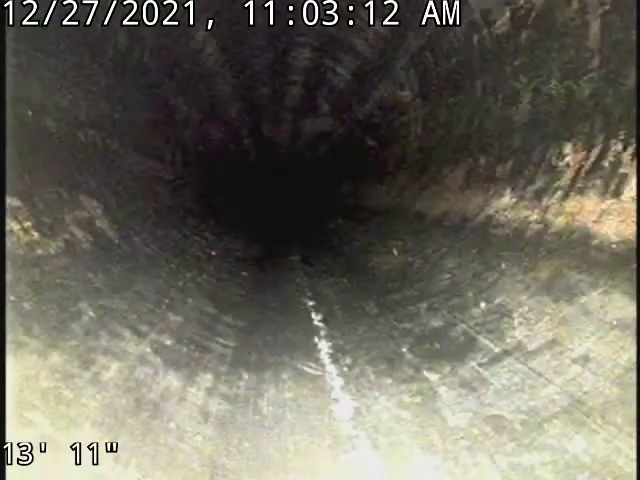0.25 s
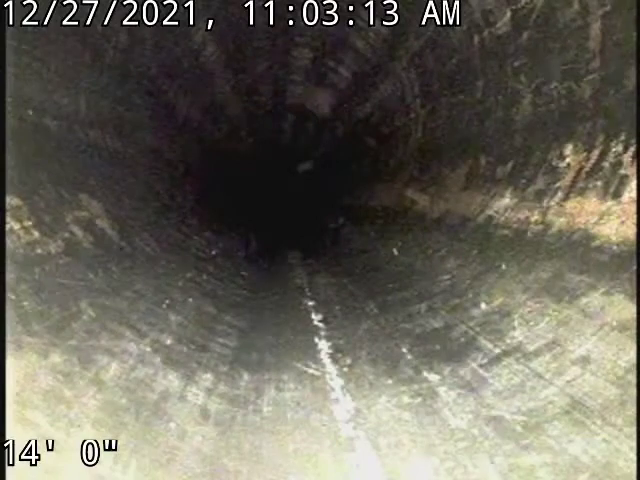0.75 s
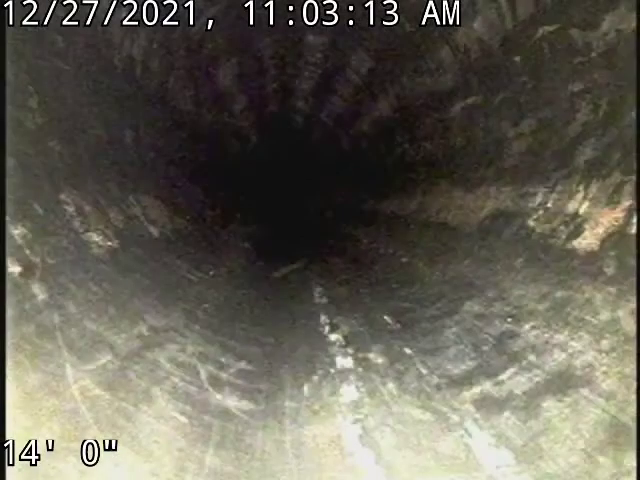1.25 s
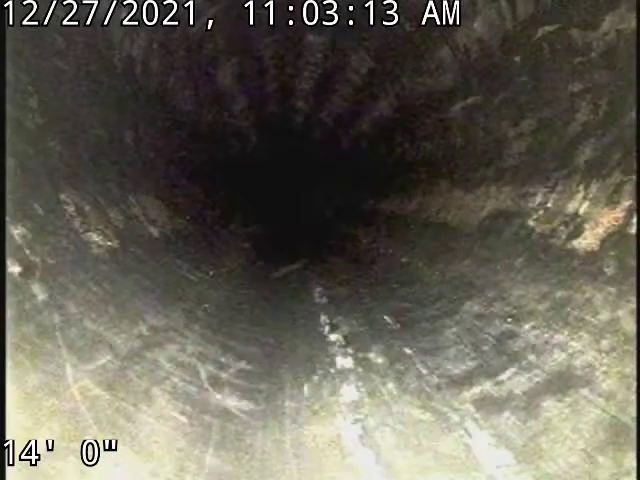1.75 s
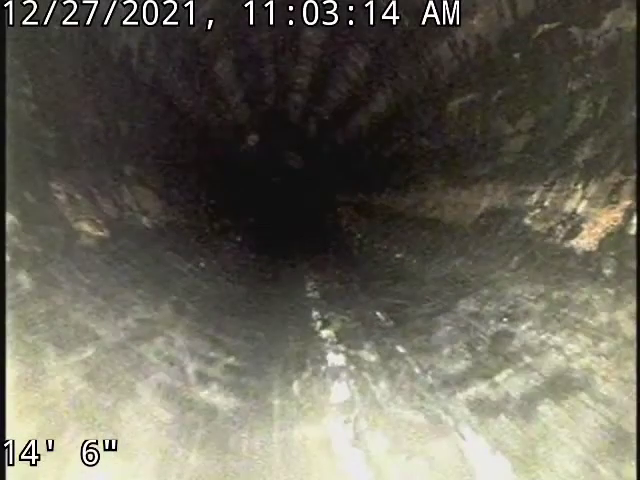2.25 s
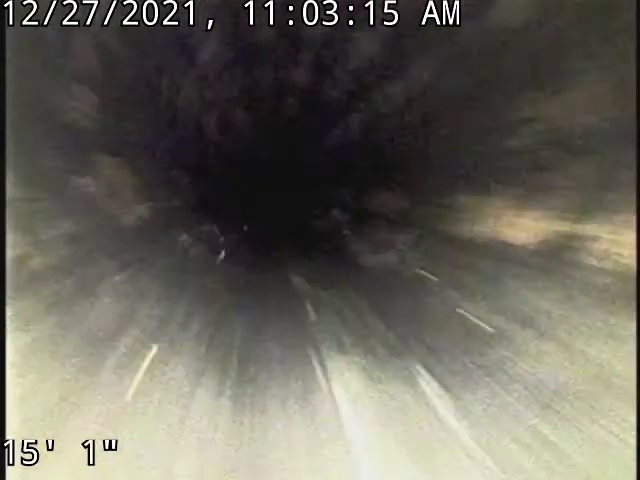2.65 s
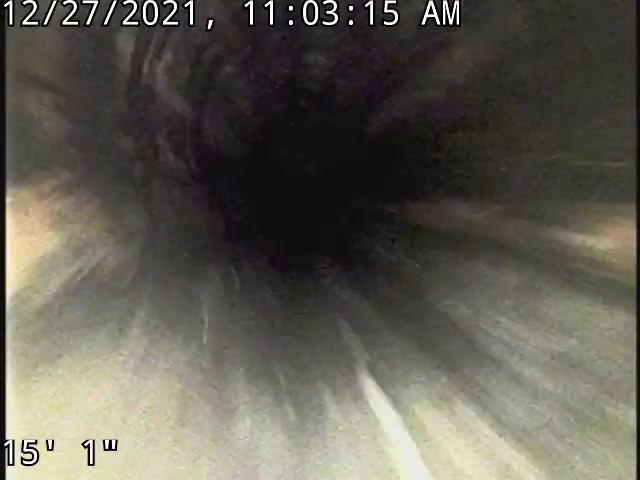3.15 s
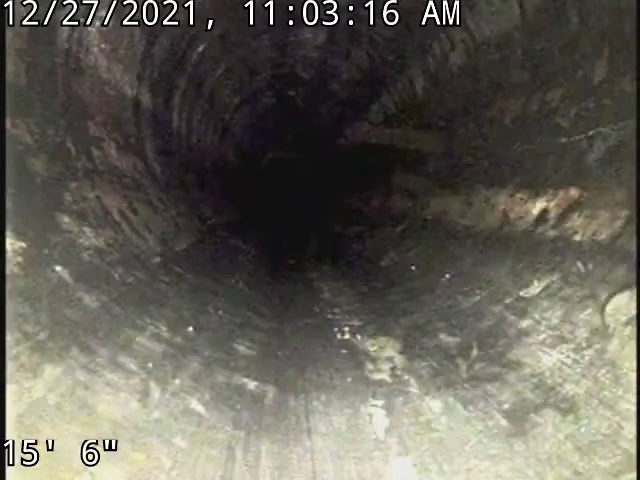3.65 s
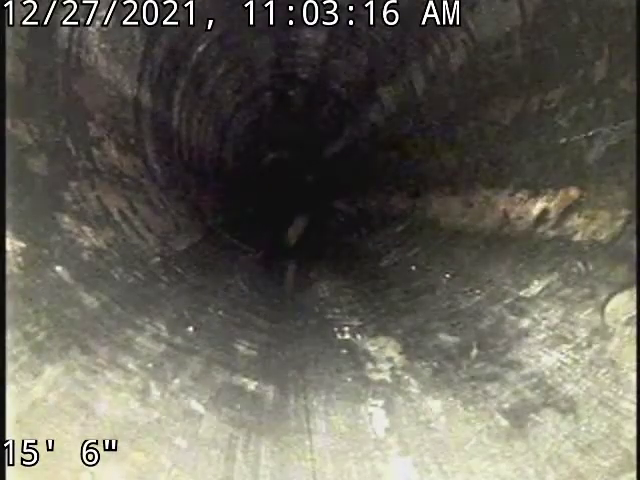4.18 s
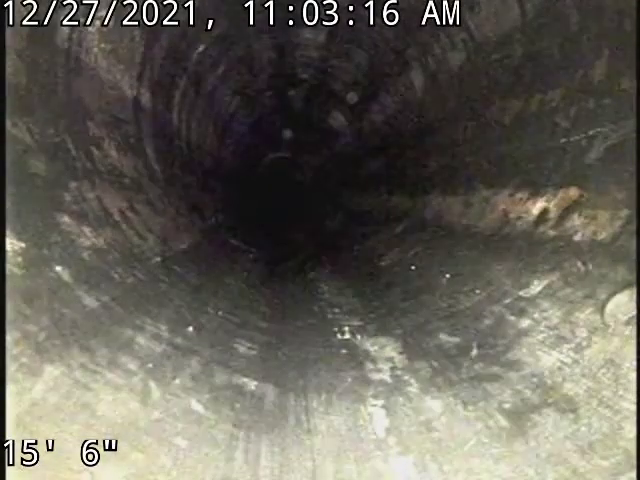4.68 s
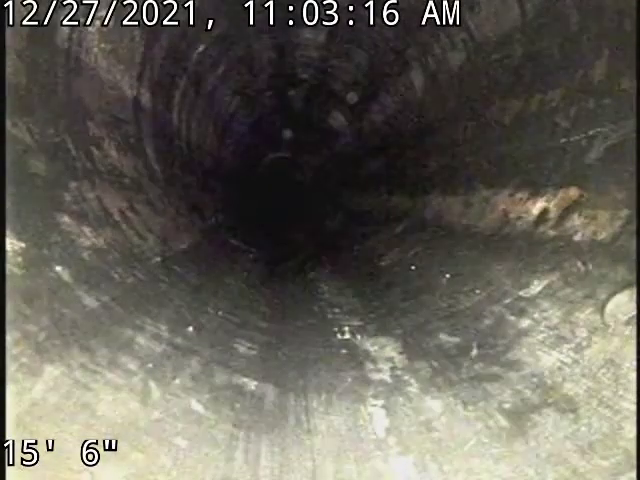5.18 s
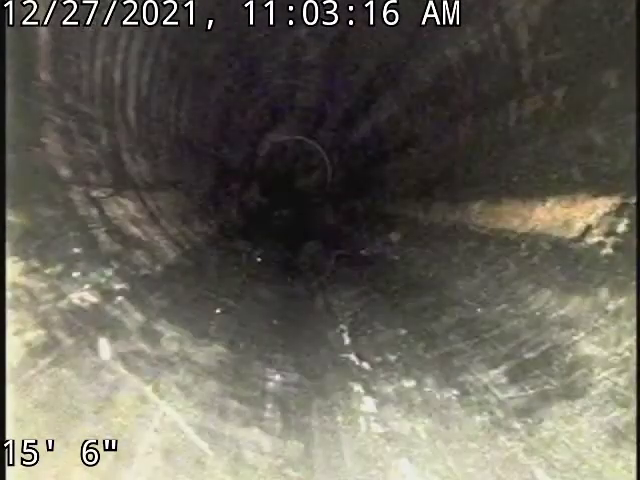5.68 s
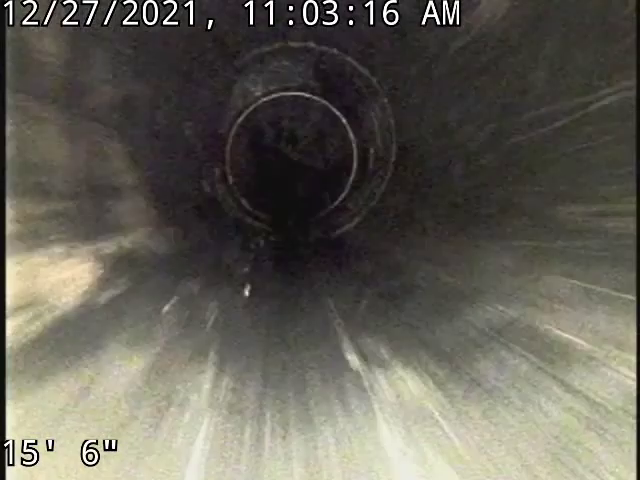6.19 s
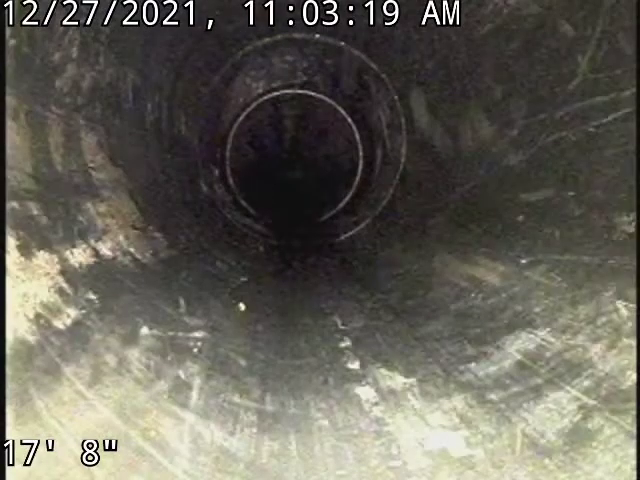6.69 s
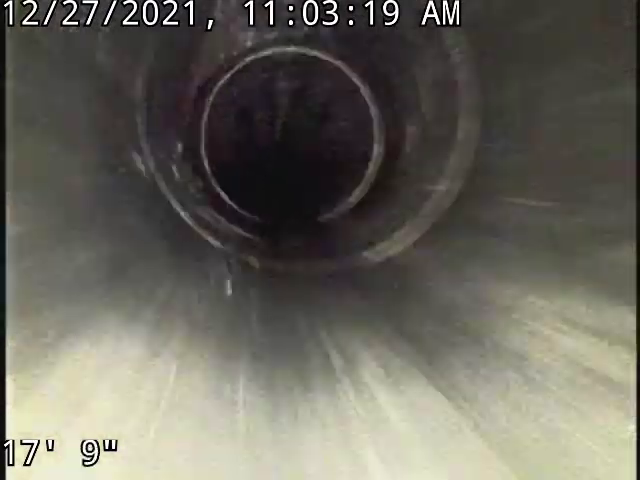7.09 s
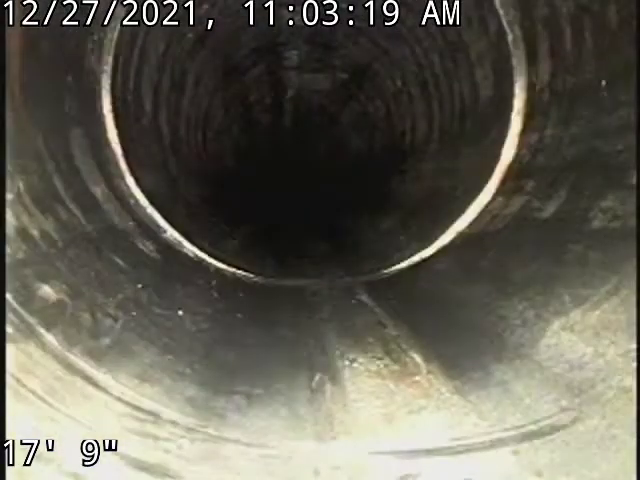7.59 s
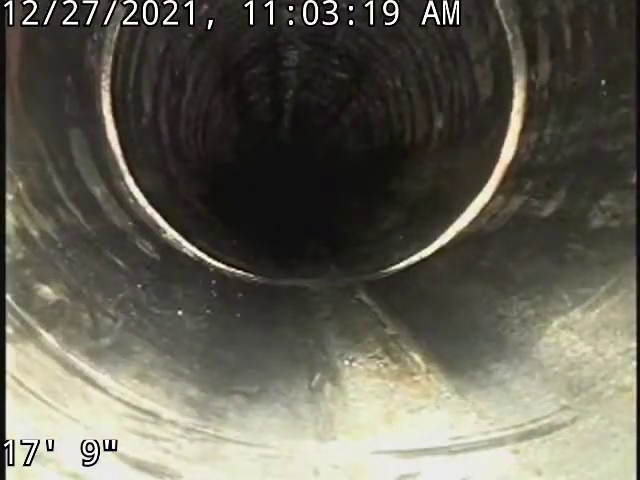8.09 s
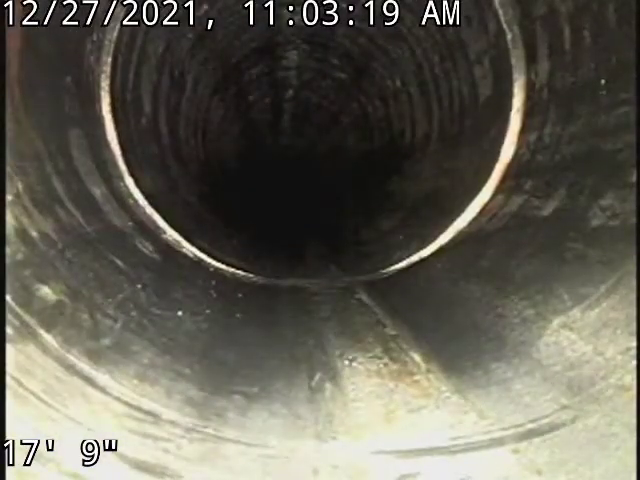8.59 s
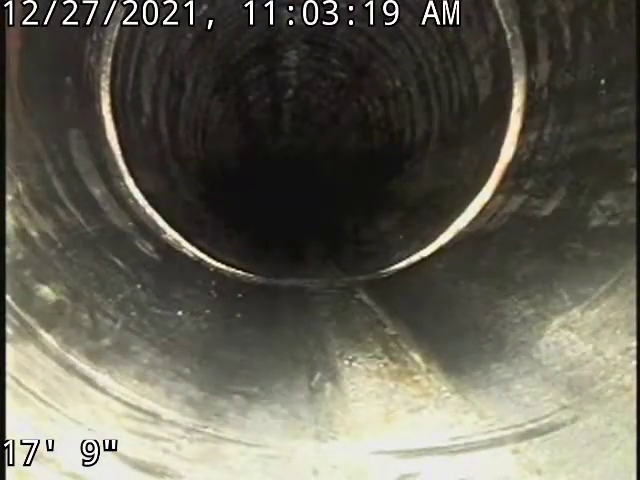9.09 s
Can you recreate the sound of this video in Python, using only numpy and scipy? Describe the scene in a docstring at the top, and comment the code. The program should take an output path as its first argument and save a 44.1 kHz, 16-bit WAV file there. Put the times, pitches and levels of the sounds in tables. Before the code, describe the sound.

A stiff cable is shoved by hand into a hollow drain pipe in jerky bursts of scraping, rattling and knocking, with quieter pauses between.

```python
"""Push cable into a drain pipe

Place: a garage, one microphone. A stiff cable is fed by hand into the pipe: each stroke is a jerk, a sag and a main shove.
Random grains of friction, heard directly and through the pipe, make the scrape, rattle and hiss; slaps are
short noise and pipe-mode bursts, groans are falling tones. Between strokes the cable creeps and the hand slides
back to a new grip, a hiss with singing resonances. Low rumble and room tone lie behind.
"""
import sys
import numpy as np
from scipy import signal
from scipy.fft import rfft, irfft, next_fast_len
from scipy.io import wavfile

SR = 44100
rng = np.random.default_rng(int(sys.argv[2]) if len(sys.argv) > 2 else 0)


def master_out(mix):
    """Clip the mix to full scale and print it as 16-bit PCM to the path in sys.argv[1]."""
    frames = np.transpose(np.atleast_2d(mix))
    ceiling = np.clip(frames, -1, 1)
    pcm = np.round(ceiling * 32767).astype(np.int16)
    wavfile.write(sys.argv[1], SR, pcm)


N = 411894
TIME = np.arange(N) / SR
RING_TIME = TIME[:SR // 2]

# Levels are relative within their layer unless a table says otherwise.
# arm pushes the cable in: start t/s, main shove t/s, end t/s, shudder level/dB, scrape level/dB
STROKES = [(-0.4, 0.011, 0.13, -36, -35.5), (0.848, 1.196, 1.365, -35, -36),
           (2.066, 2.46, 2.54, -37.5, -34.5), (3.713, 4.06, 4.242, -34.5, -36),
           (4.925, 5.33, 5.437, -37.5, -33.5), (6.13, 6.509, 6.706, -38, -37), (9.14, 9.34, 9.84, -32, -31)]
# cable creeps and settles between strokes: start t/s, end t/s, shudder level/dB, scrape level/dB
CREEPS = [(0.28, 0.4, -59.5, -66.5), (1.445, 1.56, -56.5, -62.5), (1.64, 1.857, -77.5, -64),
          (2.59, 2.72, -67.5, -72), (2.9, 3.08, -108, -67), (3.261, 3.6, -87, -70.5),
          (4.413, 4.62, -76, -65.5), (4.645, 4.84, -57, -66.5), (5.63, 6.08, -50.5, -66),
          (6.777, 6.98, -68, -74), (8.366, 8.627, -72, -67), (8.717, 8.98, -81, -60.5)]
# colour of the shudder deep in the pipe: f/Hz, level per Hz/dB
RUMBLE_COLOUR = [(45, -21.5), (100, -7.5), (145, -12.5), (185, -3.5), (280, -2), (380, -5), (520, -22.5),
                 (900, -29)]
# colour of the scrape on the rim: f/Hz, level per Hz/dB
SCRAPE_COLOUR = [(300, -10), (500, -4), (1200, -5), (1600, -9), (3200, -9), (4500, -14.5), (6300, -19),
                 (7500, -16.5), (8600, -31.5), (13000, -25.5)]
# colour of the hand's friction: f/Hz, level per Hz/dB
HISS_COLOUR = [(2500, -25), (4500, -13), (6500, -11), (7500, -5), (8500, -12), (11000, -8), (13700, 3)]
# cable hits the pipe: t/s, level/dB, hardness (0 dull thump to 1 sharp clack), pitch of the knock f/Hz
KNOCKS = [(0.072, -22.5, 0.64, 600), (0.248, -36.5, 0.47, 656), (0.305, -30.5, 1, 676),
          (0.731, -33.5, 0.69, 676), (0.846, -21.5, 0.6, 670), (1.001, -18, 0.36, 760),
          (1.083, -22, 0.06, 670), (1.119, -19.5, 0.33, 1257), (1.221, -19, 0.46, 765),
          (1.271, -20.5, 0.61, 853), (1.356, -29.5, .95, 725), (1.528, -28, 0.27, 790),
          (1.892, -28.5, 0.58, 810), (2.076, -25, 0.42, 1069), (2.099, -22.5, 0.35, 859),
          (2.165, -26, 0.13, 727), (2.241, -26.5, 0.15, 1020), (2.46, -18.5, .41, 686.4),
          (2.476, -15, 0, 593), (2.484, -13.5, 0.39, 1110), (2.582, -27.5, 0.97, 625),
          (2.765, -29.5, 0.38, 824), (2.777, -33, 0, 650), (3.495, -52.5, 0.23, 455),
          (3.588, -44, 0.47, 640), (3.737, -25.5, 0.59, 676), (3.967, -29, 0, 540), (4.018, -18, 0.44, 580),
          (4.032, -17.5, 0.05, 690), (4.136, -19.5, 0.51, 664), (4.214, -26.5, 0.28, 566),
          (4.309, -44, 0.55, 665), (4.363, -25, 0.38, 640), (4.649, -36.5, 0, 688),
          (4.696, -34.5, 0.06, 820), (4.885, -35, 0.2, 680), (4.92, -22, 0.26, 1407),
          (4.952, -21.5, 0.62, 622), (5.051, -23.5, 0.4, 1080), (5.123, -28, .25, 820),
          (5.175, -18.5, 0.24, 1180), (5.216, -27.5, 0.32, 459.3), (5.366, -18, 0.73, 650),
          (5.394, -19.5, .2, 606), (5.632, -34, 0.24, 640), (5.871, -28.5, 0.73, 631),
          (5.985, -40, 0.2, 677), (6.138, -31, 0.15, 631), (6.168, -24, 0.46, 830),
          (6.533, -23.5, 0.7, 669), (6.642, -27.5, 1, 880), (6.737, -25, 0.25, 450), (8.644, -31, 1, 1340),
          (8.664, -43, .05, 385), (9.056, -23.5, 1, 676), (9.143, -29, 0.63, 910),
          (9.311, -13.5, 0.71, 1290), (9.315, -14.5, 0.05, 780)]
# ring of pipe and cable: f/Hz, level/dB, t60/s
PIPE_MODES = [(191.4, 3, 0.17), (229, -5, 0.12), (283, 8.5, 0.082), (322, -1, 0.19), (437.4, 1, 0.15),
              (620, -24.5, 0.2), (650.4, -2.5, 0.16), (729, -11.5, 0.009), (858, 6, 0.061),
              (1028, 4, 0.035), (1152, -1.5, 0.066), (1290, -13, 0.16), (2340, -23.5, .12),
              (2579, -5.5, 0.075), (3144, -2.5, 0.057), (3920, -17.5, 0.085), (7570, -25.5, 0.068)]
# colour of dense higher modes and near reflections: f/Hz, level per Hz/dB
CLATTER_COLOUR = [(100, -21), (150, 0), (200, -4), (400, -2.5), (700, 2), (1200, 0.5), (1600, -3.5),
                  (3300, -4.5), (4500, -17), (6300, -30.5), (7600, -30), (8600, -44), (11000, -35),
                  (13500, -23.5)]
# stick-slip groans: t/s, length/s, start f/Hz, end f/Hz, level/dB
GROANS = [(0.399, 0.029, 209, 188, -39), (1.433, 0.04, 310, 278, -37), (6.602, 0.063, 296, 224, -24),
          (6.738, 0.051, 454, 427, -30)]
# hollow rub inside the pipe: t/s, level/dB
HOLLOW_RUB = [(6.6, -93), (6.95, -73.5), (8.15, -68.5), (8.3, -61.5), (8.55, -55.5), (8.8, -71),
              (9.05, -69)]
# hand slides back along the cable: t/s, length/s, level/dB
SLIDES = [(1.385, 0.44, -54.5), (6.664, 0.43, -69.5)]
# resonances of the sliding hand before the pitch glide: f/Hz, width/Hz, level/dB
SLIDE_MODES = [(1480, 90, 0), (2150, 90, -5), (2620, 130, -7), (3280, 150, 0), (3600, 130, -8)]
# hand brushes along the cable to a new grip: t/s, length/s, level/dB
BRUSHES = [(0.604, 0.13, -51.5), (1.38, 0.51, -55.5), (2.883, 0.85, -71.5), (3.315, 0.49, -63),
           (4.42, 0.87, -53), (4.59, 0.29, -55), (5.56, 0.21, -59), (6.08, 0.12, -59), (8.3, 0.96, -75),
           (8.93, 0.2, -59)]
# light taps of the grip on the cable: t/s, level/dB, f/Hz
TAPS = [(2.858, -42, 4300), (2.97, -45.5, 3430), (3.073, -39, 3600), (3.135, -57, 5000),
        (3.294, -52.5, 5800), (4.561, -45, 3670), (4.686, -38, 3480), (4.711, -38, 3630),
        (4.758, -40.5, 3900)]
# tiny sharp snaps: t/s, level/dB, f/Hz
SNAPS = [(3.602, -20, 14000), (3.847, -13.5, 13500), (6.427, -9.5, 13900)]
# colour of the room tone: f/Hz, level per Hz/dB
ROOM_COLOUR = [(100, 11.5), (300, 4), (420, -1), (800, -11.5), (1300, -19.5), (1900, -28.5), (4000, -25),
               (14000, -26)]
# colour of the low drone: f/Hz, level per Hz/dB
DRONE_COLOUR = [(22, -16), (38, -8), (52, 0), (63, -5), (85, 1), (105, -3), (130, -14), (200, -26)]
# mean course of the low drone: t/s, level/dB
DRONE_LEVEL = [(0, -51.5), (0.6, -61), (2.6, -55.5), (3.2, -64), (3.8, -60), (5.5, -51.5), (7.1, -54.5),
               (9.34, -54.5)]

# effort of a stroke, relative to its main shove
JERK_DB, SAG_DB, END_DB = -8.5, -10.5, -11.5
SAG_AT = 0.62   # share of the way from the start to the shove
ATTACK_DB_PER_S, RELEASE_DB_PER_S = 273, 138
RUMBLE_FOLLOWS, HISS_FOLLOWS = 0.83, 0.82   # share of the swing of the effort
CREEP_RISE_S, CREEP_FALL_S = 0.018, 0.076   # time constants
# the hardest contact loses this much thump, the softest this much clack and snap
THUMP_LOSS_DB, CLACK_LOSS_DB, SNAP_LOSS_DB = 28, 21, 30.5
FORE_DB, FORE_S = -21, 0.0055   # level and lead of a faint early copy of each blow
# a blow of HEAVY_KNOCK_DB booms at BOOM_DB before its hardness loss; growth in dB of boom per dB of strength
HEAVY_KNOCK_DB, BOOM_DB, BOOM_GROWS = -13, 7, 2.8
SLIDE_SAG, SLIDE_SAG_S = 0.13, 0.15   # extra pitch at the start, as a share, and its time constant


def feeding(rumble_db=2, scrape_db=-0.5, rattle_db=-1, hiss_db=-11):
    """The cable shudders and rattles deep in the pipe, scrapes on the rim and hisses through the hand."""
    *_, shudders_db, scrapes_db = np.transpose(STROKES)
    rumble_gain = effort(shudders_db, RUMBLE_FOLLOWS)
    scrape_gain = effort(scrapes_db)
    for start, end, shudder_db, creep_db in CREEPS:
        creep = held(start, end, CREEP_RISE_S, CREEP_FALL_S)
        rumble_gain = rumble_gain + from_db(shudder_db) * creep
        scrape_gain = scrape_gain + from_db(creep_db) * creep
    # rattling needs both a shudder and a sliding speed
    rattle_gain = np.sqrt(rumble_gain * scrape_gain)
    hiss_gain = effort(scrapes_db, HISS_FOLLOWS)

    shudder = through_pipe(grains(per_s=760, spread_db=3, clump_db=2.5), ring_db=-26, echo_db=1.5)
    rubbing = through_pipe(grains(per_s=2900, spread_db=-1, clump_db=0.5), ring_db=-18, echo_db=-4.5)
    rattling = through_pipe(grains(per_s=400, spread_db=7, clump_db=-2), ring_db=-9, echo_db=-1)
    rumble = coloured(shudder, RUMBLE_COLOUR)
    scrape = coloured(rubbing, SCRAPE_COLOUR)
    rattle = rms_one(band(rattling, 480, 1300))
    hiss = coloured(grains(per_s=48000, spread_db=6.5, clump_db=3.5), HISS_COLOUR)
    return (from_db(rumble_db) * rumble_gain * rumble
            + from_db(scrape_db) * scrape_gain * scrape
            + from_db(rattle_db) * rattle_gain * rattle
            + from_db(hiss_db) * hiss_gain * hiss)


def effort(levels_db, follows=1):
    """Gain of all strokes: a jerk gets the cable moving, it sags, then comes the main shove and the release."""
    gain = np.zeros(N)
    for (start, shove, end, *_), db in zip(STROKES, levels_db):
        sag = start + SAG_AT * (shove - start)
        shape_db = np.interp(TIME, [start, sag, shove, end], [JERK_DB, SAG_DB, 0, END_DB])
        shape_db -= ATTACK_DB_PER_S * np.maximum(start - TIME, 0)
        shape_db -= RELEASE_DB_PER_S * np.maximum(TIME - end, 0)
        gain += from_db(db + follows * shape_db)
    return gain


def grains(per_s, spread_db, clump_db):
    """Asperities catch and let go at random, in clumps."""
    sizes = from_db(spread_db * np.minimum(rng.exponential(1, N), 4)) * rng.choice([-1, 1], N)
    catches = rng.random(N) < per_s / SR
    return catches * sizes * from_db(clump_db * drift(45))


def through_pipe(friction, ring_db, echo_db, echo_t60=0.15):
    """Friction reaches the ear directly, through the pipe modes and off near surfaces."""
    echoes = unit_energy(rng.standard_normal(len(RING_TIME)) * dying(echo_t60))
    response = from_db(ring_db) * pipe_ring() + from_db(echo_db) * echoes
    response[0] += 1   # direct path
    return signal.fftconvolve(friction, response)[:N]


def pipe_ring():
    """Decaying pipe modes; every contact point weights them in its own way."""
    hz, db, t60 = np.transpose(PIPE_MODES)[:, :, None]
    strength = from_db(db + 5.8 * rng.standard_normal(db.shape)) * rng.choice([-1, 1], db.shape)
    modes = strength * dying(t60) * np.sin(2 * np.pi * hz * RING_TIME)
    return unit_energy(np.sum(modes, axis=0))


def knocks(shared_paths=0.43, modes_db=-4, focus_db=3, gains_db=(24, 26.5, 24, 14.5)):
    """Each slap is a faint fore-sound, a touch and bounces; hardness weights its registers, heavy ones boom."""
    out = np.zeros(N)
    # a long stretch of cable lies down on the wall, so the blow builds over a few milliseconds
    build = 1 - np.exp(-RING_TIME / 0.0028)
    # direct sound, body of the pipe and, far weaker, the garage
    decay = dying(0.04) + from_db(-5) * dying(0.15) + from_db(-28) * dying(0.31)
    same_paths = rng.standard_normal(len(RING_TIME))
    rings = [pipe_ring() for _ in range(12)]
    for k, (s, db, hard, knock_hz) in enumerate(KNOCKS):
        own_paths = rng.standard_normal(len(RING_TIME))
        paths = np.sqrt(shared_paths) * same_paths + np.sqrt(1 - shared_paths) * own_paths
        clatter = unit_energy(coloured(paths, CLATTER_COLOUR) * decay)
        hit = bounced(build * (clatter + from_db(modes_db) * rings[k % len(rings)]))

        # the free length of cable that is struck favours one pitch
        focus = band(hit, 0.9 * knock_hz, 1.086 * knock_hz, order=1)
        knock = band(hit + from_db(focus_db) * focus, 420, 1450)
        thump = band(hit, 182.6, 360)
        clack = band(hit, 1800, 4990)
        snap = band(hit, 5280, 10000)
        thump_loss_db = THUMP_LOSS_DB * hard ** 2
        soft = (1 - hard) ** 2
        losses_db = 0, thump_loss_db, CLACK_LOSS_DB * soft, SNAP_LOSS_DB * soft
        for sound, loss_db, gain_db in zip((knock, thump, clack, snap), losses_db, gains_db):
            blow = from_db(db + gain_db - loss_db) * unit_energy(sound)
            add(out, s, blow)
            add(out, s - FORE_S, from_db(FORE_DB) * blow)
        boom_db = BOOM_DB + BOOM_GROWS * (db - HEAVY_KNOCK_DB) - thump_loss_db
        add(out, s, from_db(boom_db) * unit_energy(band(hit, 182, 245)))
    return out


def bounced(touch, bounce=0.17, chatter_s=0.011):
    """The touch repeats in four weak bounces of random size and sign within the chatter time."""
    hit = touch.copy()
    for when, size in zip(rng.random(4), rng.standard_normal(4)):
        lag = 1 + int(when * chatter_s * SR)
        hit[lag:] += bounce * size * touch[:-lag]
    return hit


def groans(overtone_db=-20):
    """The cable sticks and slips for a few cycles, ever slower."""
    out = np.zeros(N)
    for s, length, start_hz, end_hz, db in GROANS:
        along = np.linspace(0, 1, int(length * SR))
        phase = 2 * np.pi * np.cumsum(start_hz + (end_hz - start_hz) * along) / SR
        swell = np.abs(np.sin(np.pi * along ** 0.46))
        tone = np.sin(phase) + from_db(overtone_db) * np.sin(2 * phase)
        add(out, s, from_db(db) * swell * tone)
    return out


def hollow_rub(low_hz=560, high_hz=1080):
    """Slow, fine friction heard through the pipe."""
    friction = through_pipe(grains(per_s=4200, spread_db=1, clump_db=4), ring_db=-24.5, echo_db=-3.5)
    gain = from_db(np.interp(TIME, *np.transpose(HOLLOW_RUB)))
    return gain * rms_one(band(friction, low_hz, high_hz, order=2))


def hand_slide(gain_db=3):
    """Rubbing resonances that sink in pitch as the hand slows."""
    push = sum((TIME >= s) * np.exp(-np.abs(TIME - s) / SLIDE_SAG_S) for s, _, _ in SLIDES)
    phase = 2 * np.pi * np.cumsum(0.97 + SLIDE_SAG * push) / SR   # for a mode of 1 Hz
    song = 0
    for hz, width, db in SLIDE_MODES:
        # two drifting quadrature parts blur the tone into a narrow band
        mode = drift(2 * width) * np.sin(hz * phase) + drift(2 * width) * np.cos(hz * phase)
        song += from_db(db) * mode
    return from_db(gain_db) * sweeps(SLIDES) * rms_one(song)


def brushes():
    """A quick airy friction hiss of the hand on the cable."""
    return sweeps(BRUSHES) * coloured(grains(per_s=11000, spread_db=3.5, clump_db=2), HISS_COLOUR)


def sweeps(rows):
    """Gain of hand movements that swell early and taper slowly."""
    gain = np.zeros(N)
    for s, length, db in rows:
        along = np.linspace(0, 1, int(length * SR))
        add(gain, s, from_db(db) * np.sin(np.pi * np.sqrt(along)) ** 2)
    return gain


def ticks(rows, width, t60, gain_db):
    """Small hard contacts: a bright, narrow noise burst that dies quickly."""
    out = np.zeros(N)
    for s, db, hz in rows:
        noise = rng.standard_normal(len(RING_TIME)) * dying(t60)
        burst = band(noise, hz / (1 + width), hz * (1 + width), order=1)
        add(out, s, from_db(db + gain_db) * unit_energy(burst))
    return out


def low_drone():
    """Low rumble filling the room: coloured noise whose level wavers around a slow course."""
    level_db = np.interp(TIME, *np.transpose(DRONE_LEVEL)) + 1.7 * drift(24)
    return from_db(level_db) * coloured(rng.standard_normal(N), DRONE_COLOUR)


def room_tone(level_db=-65.5):
    """Steady coloured noise of the room."""
    return from_db(level_db) * coloured(rng.standard_normal(N), ROOM_COLOUR)


def from_db(db):
    """Decibels to gain."""
    return 10 ** (np.asarray(db) / 20)


def rms_one(x):
    """Scale to rms 1."""
    return x / np.sqrt(np.mean(x ** 2) + 1e-20)


def unit_energy(x):
    """Scale to a summed square of 1."""
    return x / np.sqrt(np.sum(x ** 2) + 1e-20)


def add(out, s, sound):
    """Mix a sound in at a given time."""
    start = int(np.clip(round(s * SR), 0, N - 1))
    out[start:start + len(sound)] += sound[:N - start]


def band(x, low_hz, high_hz, order=3):
    """Causal band-pass."""
    sos = signal.butter(order, [low_hz, high_hz], "band", fs=SR, output="sos")
    return signal.sosfilt(sos, x + 1e-18)


def coloured(x, spectrum):
    """Give a sound a spectrum that falls away beyond both ends; rms 1."""
    size = next_fast_len(len(x))
    hz, db = np.transpose(spectrum)
    bins_hz = np.arange(size // 2 + 1) * SR / size + 1   # 1 Hz up, to avoid log(0)
    gain = from_db(np.interp(np.log(bins_hz), np.log(hz), db))
    gain *= np.minimum(bins_hz / hz[0], 1) ** 2
    gain *= np.minimum(hz[-1] / bins_hz, 1) ** 2
    return rms_one(irfft(rfft(x, size) * gain, size)[:len(x)])


def drift(rate):
    """Slow chance: normal random knots, rate per second, joined by lines."""
    knots = rng.standard_normal(4096)
    return np.interp(TIME * rate, np.arange(len(knots)), knots)


def dying(t60):
    """Exponential decay by 60 dB in t60 seconds."""
    return from_db(-60 * RING_TIME / t60)


def held(start, end, rise_s, fall_s):
    """Gain that rises to 1 at the start, holds and dies away after the end."""
    return np.exp(-np.maximum(start - TIME, 0) / rise_s - np.maximum(TIME - end, 0) / fall_s)


def scene():
    """Cable, hand and room at one microphone."""
    cable = feeding() + knocks() + groans() + hollow_rub()
    taps = ticks(TAPS, width=0.11, t60=0.07, gain_db=12.5)
    snaps = ticks(SNAPS, width=0.044, t60=0.0064, gain_db=4)
    hand = hand_slide() + brushes() + taps
    return (cable + hand + snaps + low_drone() + room_tone())[None]


def record(dry, cutoff_hz=14200):
    """The microphone signal has its top cut steeply."""
    low_pass = signal.ellip(10, 0.2, 80, cutoff_hz, fs=SR, output="sos")   # ripple/dB, stopband/dB
    return signal.sosfilt(low_pass, dry)


dry = scene()
out = record(dry)
master_out(out)
```